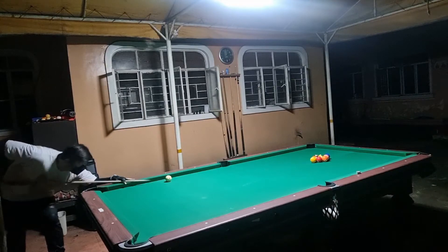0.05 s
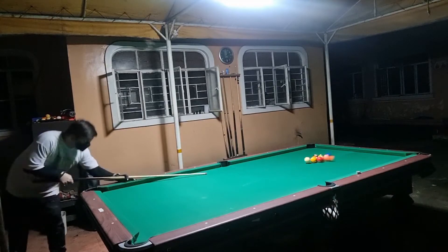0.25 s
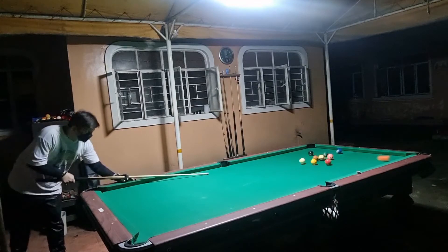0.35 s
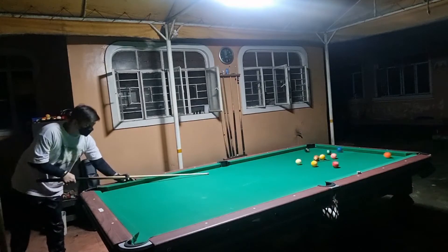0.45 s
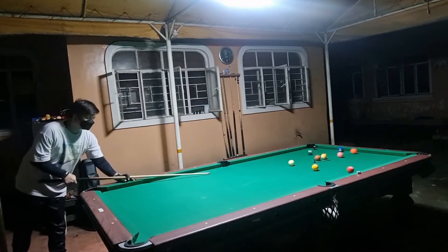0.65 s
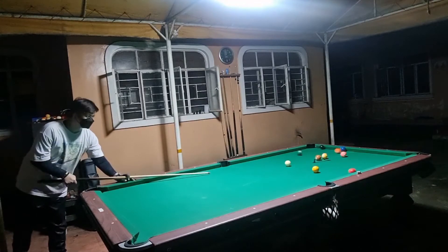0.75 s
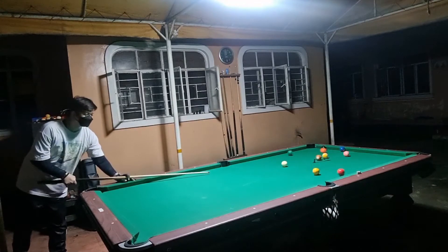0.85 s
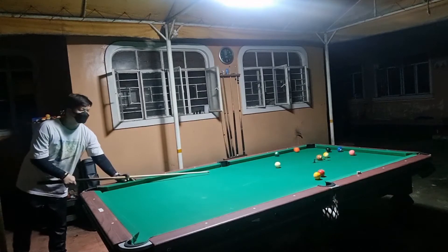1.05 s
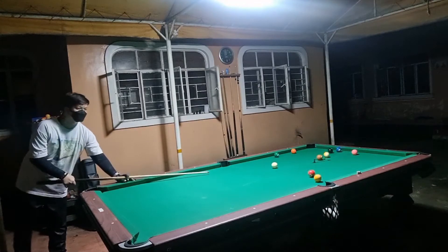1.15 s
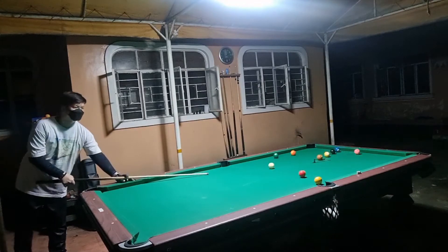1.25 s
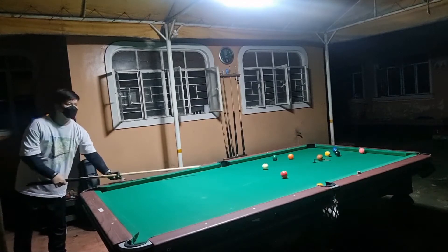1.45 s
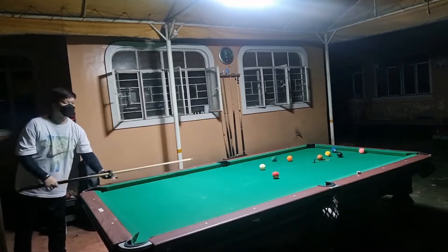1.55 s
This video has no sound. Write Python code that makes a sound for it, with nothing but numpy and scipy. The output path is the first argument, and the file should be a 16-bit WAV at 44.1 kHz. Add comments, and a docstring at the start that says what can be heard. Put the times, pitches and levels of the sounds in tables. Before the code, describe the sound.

Billiard balls are broken in a quiet, roofed outdoor space. A gritty cue crack and brief scrape lead into a loud rattle of hard balls, then low rolling and scattered cushion thuds fade over a faint hum.

```python
"""A pool table under a low roof, open at the sides: a break shot.
The cue cracks against the white ball and its shaft scrapes on over the rail; the ball hops along the
slate and bursts the rack. The balls rattle apart and roll, two click together, others thud into the
cushions and set the table booming. A faint hum, a light scuff and a soft rustle lie behind."""
import sys
import numpy as np
from scipy import signal
from scipy.fft import rfft, irfft
from scipy.io import wavfile
from scipy.ndimage import uniform_filter1d, minimum_filter1d

SR = 44100
rng = np.random.default_rng(int(sys.argv[2]) if len(sys.argv) > 2 else 0)


def unload_audio(sound):
    """Save the sound as a 16-bit wav file, at the path given as the first command line argument."""
    columns = np.transpose(np.atleast_2d(sound))
    # keep every value between -1 and 1, then stretch to whole-number steps
    steps = np.round(np.clip(columns, -1, 1) * 32767)
    wavfile.write(sys.argv[1], SR, steps.astype(np.int16))


N = 70560
T = np.arange(N) / SR
HZ = np.maximum(np.arange(N + 1) * SR / (2 * N), 1)

# tone of one ball striking another: frequency_hz, level_db
CLICK_SPECTRUM = [(150, -35.5), (500, -20), (900, -14.5), (1400, -1.5), (2000, 2), (2750, 4), (3500, -4),
                  (4500, -13), (6500, -24.5), (8200, -42.5), (15000, -35.5)]


def cue(room):
    """The tip bites with a gritty crack, slips for a moment on the ball and sets the shaft ringing."""
    # tone of the crack: frequency_hz, level_db
    crack_spectrum = [(60, -28.5), (130, -10), (230, -7.5), (700, 0), (1050, -1), (1500, 2.5), (2100, -5),
                      (3800, 4), (4900, -2.5), (6500, -9.5), (7600, -15.5), (12000, -23), (15500, -34)]
    # resonances of the cue: pitch_hz, level_db, t60_s
    cue_modes = [(1327, -14, 0.027), (1518, -12, 0.029), (2756, -7.5, 0.043), (2890, -17.5, 0.023),
                 (3220, -26.5, .03), (4354, -12, 0.03), (5587, -21, .025), (6640, -22.5, 0.039)]
    start_s, hit_db, slip_db, tip_rise_s, low_cut_hz = 0.2172, -4.5, -13, 0.00041, 175
    age = np.maximum(T - start_s, 0)
    hit = impulses([(start_s, hit_db)])
    slip = from_db(slip_db) * rng.standard_normal(N) * (age > 0) * decay(age, t60_s=0.036)
    blow = convolve(hit + slip, snap(at_hz(crack_spectrum))) + convolve(hit, ring(cue_modes))
    blow = signal.sosfilt(signal.butter(2, low_cut_hz, "high", fs=SR, output="sos"), blow)
    blow *= 1 - np.exp(-age / tip_rise_s)  # the leather tip compresses
    return place(room, blow, lag_ms=-0.14, pan_db=1.6, room_db=4, reflect_db=-11.5)


def ball_clicks(room):
    """Hard balls click without ringing; the reverberation draws the clatter out."""
    # ball meets ball, duller above the corner: start_s, level_db, corner_hz
    collisions = [(0.3830, -2, 6000), (0.3836, 0.5, 5000), (0.3862, -9.5, 5050), (0.3933, -3.5, 6000),
                  (0.4011, -1.5, 6000), (0.4164, -4, 6000), (0.4336, -4.5, 6000), (0.6416, -8.5, 1229)]
    clicks = np.zeros(N)
    for start_s, level_db, corner_hz in collisions:
        dulling_db = 10 * np.log10(1 + (HZ / corner_hz) ** 2)
        clicks += convolve(impulses([(start_s, level_db)]), snap(at_hz(CLICK_SPECTRUM) - dulling_db))
    return place(room, clicks, lag_ms=0.23, pan_db=0.45, room_db=3.5, reflect_db=0)


def rack_rattle(room):
    """A quick run of light contacts as the rack spreads."""
    start_s, length_s, level_db, fade_db, contacts_per_s = 0.393, 0.055, -10.5, 2.5, 330
    polarity = rng.choice([-1, 1], N)
    count = int(contacts_per_s * length_s)
    progress = (np.arange(count) + rng.random(count)) / count
    contacts = impulses(zip(start_s + length_s * progress, level_db - fade_db * progress))
    rattle = convolve(contacts * polarity, snap(at_hz(CLICK_SPECTRUM)))
    return place(room, rattle, lag_ms=0.14, pan_db=2.8, room_db=0.5, reflect_db=3.5)


def shaft_scrape(room):
    """The shaft slaps the rail and scrapes over it in a fading run of grains."""
    # tone of shaft on rail: frequency_hz, level_db
    scrape_spectrum = [(150, -20), (600, 2.5), (2000, 1.5), (4200, 0.5), (6800, 8.5), (7700, -9),
                       (9500, -18), (15000, -46)]
    start_s, length_s, grains_per_s = 0.2712, 0.04, 610
    slap_db, grain_db, fade_db, scatter_db = -7, -11, 8.5, 6
    progress, softness = rng.random((int(grains_per_s * length_s), 2)).T
    levels_db = grain_db - fade_db * progress - scatter_db * softness
    grains = impulses(zip(start_s + length_s * progress, levels_db)) * rng.choice([-1, 1], N)
    scrape = convolve(grains + impulses([(start_s, slap_db)]), snap(at_hz(scrape_spectrum)))
    return place(room, scrape, lag_ms=-0.05, pan_db=5.0, room_db=-6, reflect_db=-4)


def cushion_thuds(room):
    """The rubber gives way under a ball, the table booms and the rail knocks."""
    # ball meets cushion: start_s, frame_db, bed_db, rail_db
    thuds = [(0.532, -25, -11, -21), (0.553, -18.5, -40, -24), (0.586, -34, -23.5, -29.5),
             (0.685, -30.5, -26.5, -43), (0.735, -45, -31.5, -70), (0.873, -63, -26, -48.5),
             (0.919, -50, -31, -47), (1.149, -55, -35.5, -53.5), (1.225, -48, -62, -40),
             (1.231, -29.5, -26.5, -57), (1.277, -62, -31, -50)]
    # resonances of the table's frame, bed and rail: pitch_hz, level_db, t60_s
    frame_modes = [(65.3, -3, 0.23)]
    bed_modes = [(108.5, 3.5, .12), (118.5, -16.5, .08)]
    rail_modes = [(202, -3, 0.049), (260.6, -11, 0.22), (286, -0.5, 0.076), (338.8, -9.5, 0.18),
                  (483, 3, 0.025)]
    start_s, frame_db, bed_db, rail_db = np.transpose(thuds)
    frame = convolve(impulses(zip(start_s, frame_db)), soft_ring(frame_modes, rise_s=0.011))
    bed = convolve(impulses(zip(start_s, bed_db)), soft_ring(bed_modes, rise_s=0.011))
    knocks = convolve(impulses(zip(start_s, rail_db)), soft_ring(rail_modes, rise_s=0.0024))
    boom = frame - bed  # stays dry and centred
    return boom + place(room, knocks, lag_ms=0.1, pan_db=4.0, room_db=-9.5, reflect_db=-4)


def slate_hops(room):
    """Hopping balls land with hollow knocks, softened by the cloth."""
    # ball lands on slate: start_s, level_db
    landings = [(0.293, -20), (0.361, -18.5), (0.466, -20), (0.521, -20), (0.552, -25)]
    # resonances of the slate: pitch_hz, level_db, t60_s
    slate_modes = [(291, -10, 0.063), (493, -3.5, 0.054), (590, 0.5, 0.058), (654.3, 0, 0.085),
                   (843, -5.5, 0.052)]
    knocks = convolve(impulses(landings), soft_ring(slate_modes, rise_s=0.0046))
    return place(room, knocks, lag_ms=0.1, pan_db=5.5, room_db=-16, reflect_db=-9)


def rolling():
    """Balls rumble over the slate, fading as they slow down."""
    # swell and fade of the rumble: time_s, level_db
    roll_levels = [(0.2, -65), (0.26, -44), (0.38, -38), (0.47, -34.5), (0.6, -36.5), (0.8, -62.5),
                   (1.1, -72), (1.6, -64)]
    # tone of the rumble: frequency_hz, level_db
    roll_spectrum = [(30, -39), (70, -10.5), (115, -2.5), (190, -4), (350, -1.5), (650, -0.5), (1100, -2.5),
                     (2500, -37.5)]
    return envelope(roll_levels) * diffuse(at_hz(roll_spectrum))


def scuff():
    """A brief, faint rub."""
    # tone of the rub: frequency_hz, level_db
    scuff_spectrum = [(900, -25), (1400, 12.5), (1900, -37), (4000, -5.5), (4800, 2), (5800, -3),
                      (7000, -10), (15000, -15)]
    start_s, level_db, rise_s = 1.332, -49, 0.013
    age = np.maximum(T - start_s, 0)
    swell = (1 - np.exp(-age / rise_s)) * decay(age, t60_s=0.31)
    return from_db(level_db) * swell * diffuse(at_hz(scuff_spectrum))


def background():
    """Still air, a faint two-note machine hum and a soft, clothlike rustle."""
    # notes of the hum: pitch_hz, rms_db
    hum_notes = [(581.4, -63.5), (872.1, -65)]
    # swell and fade of the rustle: time_s, level_db
    rustle_levels = [(1.06, -94), (1.12, -59), (1.3, -65.5), (1.45, -63), (1.6, -81)]
    # tone of the rustle and of the air: frequency_hz, level_db
    rustle_spectrum = [(1000, -13), (3000, -11), (5000, 2), (7500, 11), (10000, 3), (15000, 2.5)]
    air_spectrum = [(25, -29.5), (65, 1.5), (110, 3), (170, -10.5), (300, -5.5), (450, -4.5), (650, -0.5),
                    (1100, -8), (2300, -15.5), (4000, -22), (7000, -23), (9000, -29), (15000, -34.5)]
    hum = sum(from_db(db) * np.sqrt(2) * np.sin(2 * np.pi * (hz * T + rng.random()))
              for hz, db in hum_notes)
    rustle = envelope(rustle_levels) * diffuse(at_hz(rustle_spectrum))
    air = from_db(-53) * diffuse(at_hz(air_spectrum))
    return air + hum + rustle


def roof_reverb():
    """A diffuse tail that builds up and dies band by band; unit energy per channel on average."""
    # decay under the roof: frequency_hz, t60_s
    decay_times = [(100, 0.23), (500, 0.81), (1300, 0.45), (2500, 0.55), (4500, 0.51), (9000, .58),
                   (15000, 0.25)]
    build_s, centres_hz = 0.0017, np.geomspace(80, 16000, 12)
    noise, tail = rfft(diffuse(0 * HZ), 2 * N), 0
    for hz, weights in zip(centres_hz, np.eye(len(centres_hz))):
        band = irfft(noise * np.interp(np.log(HZ), np.log(centres_hz), weights))[:, :N]
        tail += band * decay(T, at_hz(decay_times, hz))
    tail *= 1 - np.exp(-T / build_s)
    return tail / np.sqrt((tail ** 2).sum() / 2)


def place(room, sound, lag_ms, pan_db, room_db, reflect_db):
    """Direct sound, reflections and reverb; lag_ms delays the left side, pan_db leans towards it."""
    # bounces off hard surfaces nearby: arrival_s, left_db, right_db
    reflections = [(.0009, -9.5, -2), (.0021, -47, -6), (.0098, -3, -38), (.0121, -13, -11.5)]
    direct, early = impulses([(0.002, 0.0071)]), []
    for channel, lag_s in enumerate(np.maximum([lag_ms, -lag_ms], 0) / 1000):
        bounces = impulses((row[0], row[1 + channel] + reflect_db) for row in reflections)
        early.append(convolve(direct + bounces, impulses([(lag_s, 0)])))
    response = np.array(early) + from_db(room_db) * room
    return convolve(sound, response) * from_db([[pan_db / 2], [-pan_db / 2]])


def diffuse(spectrum_db):
    """Stereo noise from all sides, nearly mono in the bass; rms 1."""
    # how alike left and right are: frequency_hz, correlation
    likeness = [(60, 0.7), (120, .93), (250, 0.85), (500, -0.61), (1200, -0.59), (2500, -0.12),
                (5000, -0.092), (12000, 0.2)]
    mid, side = rfft(rng.standard_normal((2, 2 * N)))
    alike = at_hz(likeness)
    stereo = np.sqrt(1 + alike) * mid + np.sqrt(1 - alike) * side * [[1], [-1]]
    noise = irfft(from_db(spectrum_db) * stereo)[:, :N]
    return noise / noise.std()


def snap(spectrum_db):
    """The tightest click with this spectrum (minimum phase); peak 1."""
    cepstrum = irfft(np.log(from_db(spectrum_db)))[:N] * np.where(T > 0, 2, 1)
    pulse = irfft(np.exp(rfft(cepstrum, 2 * N)))[:N]
    return pulse / np.abs(pulse).max()


def ring(modes):
    """Decaying sines of a struck body."""
    return sum(from_db(db) * np.sin(2 * np.pi * hz * T) * decay(T, t60_s) for hz, db, t60_s in modes)


def soft_ring(modes, rise_s):
    """A ring eased in by a yielding contact."""
    return ring(modes) * (1 - np.exp(-T / rise_s)) ** 2


def impulses(hits):
    """One spike for each start_s, level_db."""
    track = np.zeros(N)
    for start_s, level_db in hits:
        track[int(np.clip(start_s * SR, 0, N - 1))] += from_db(level_db)
    return track


def decay(age, t60_s):
    """A fade of 60 dB every t60_s."""
    return np.exp(-np.log(1000) * age / t60_s)


def envelope(points):
    """A gain curve through time_s, level_db points."""
    return from_db(np.interp(T, *np.transpose(points)))


def at_hz(points, hz=HZ):
    """Read a table on a log-frequency axis."""
    frequencies, values = np.transpose(points)
    return np.interp(np.log(hz), np.log(frequencies), values)


def convolve(sound, response):
    """Play a sound through a response."""
    return irfft(rfft(sound, 2 * N) * rfft(response, 2 * N))[..., :N]


def from_db(db):
    """Decibels to gain."""
    return 10 ** (np.asarray(db) / 20)


def scene():
    """Everything on and around the table, under one roof."""
    room = roof_reverb()
    return (background() + scuff() + rolling() + cue(room) + ball_clicks(room) + slate_hops(room)
            + cushion_thuds(room) + rack_rattle(room) + shaft_scrape(room))


def record(dry):
    """A fast limiter tames the peaks, then a steep filter cuts the extreme treble."""
    ceiling, window_samples, cutoff_hz = 0.96, 91, 16000
    gain = np.minimum(1, ceiling / (np.abs(dry).max(axis=0) + 1e-9))
    gain = uniform_filter1d(minimum_filter1d(gain, window_samples), window_samples)
    return signal.sosfilt(signal.ellip(12, 0.1, 80, cutoff_hz, fs=SR, output="sos"), dry * gain)


dry = scene()
out = record(dry)
unload_audio(out)
```